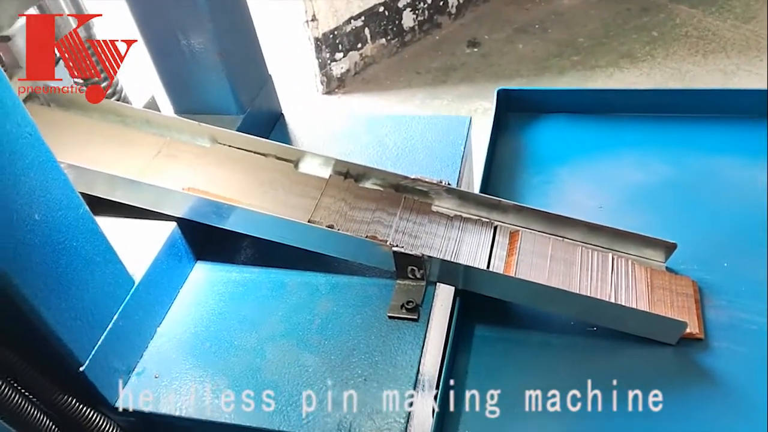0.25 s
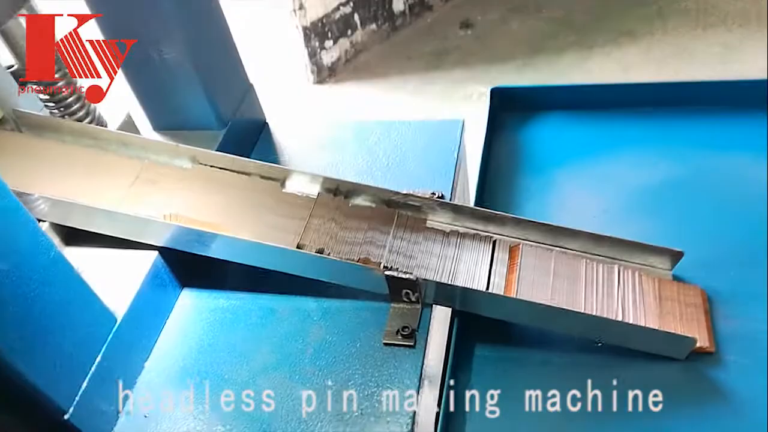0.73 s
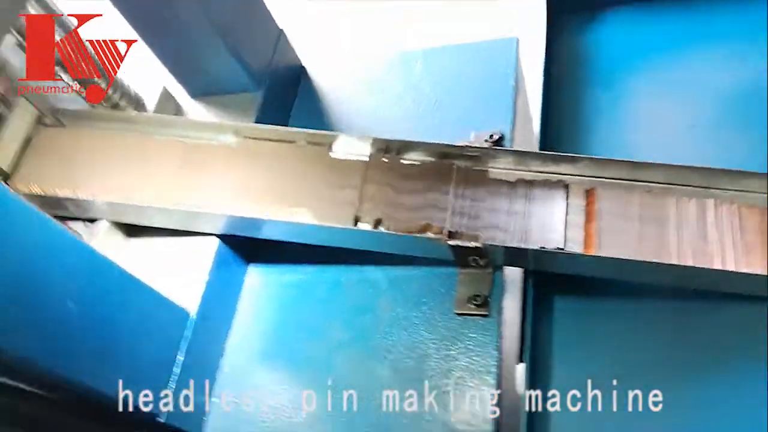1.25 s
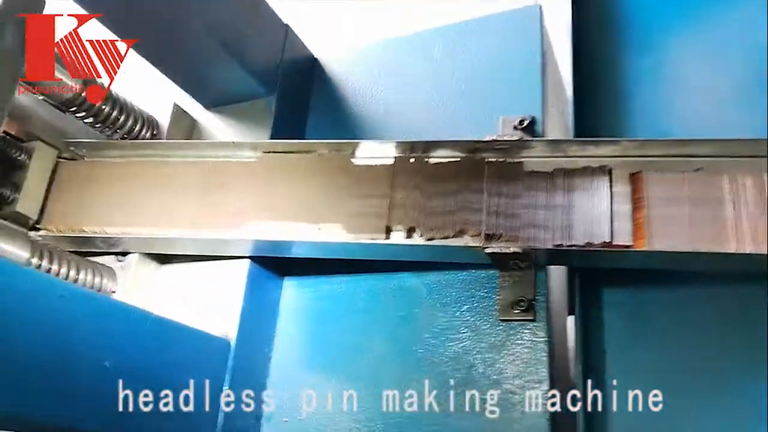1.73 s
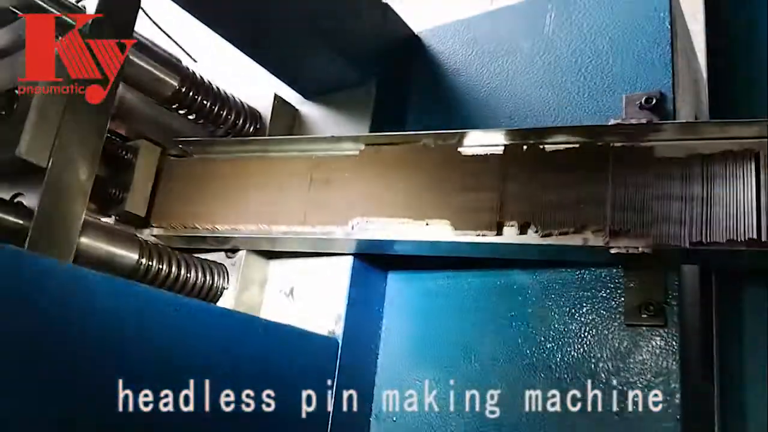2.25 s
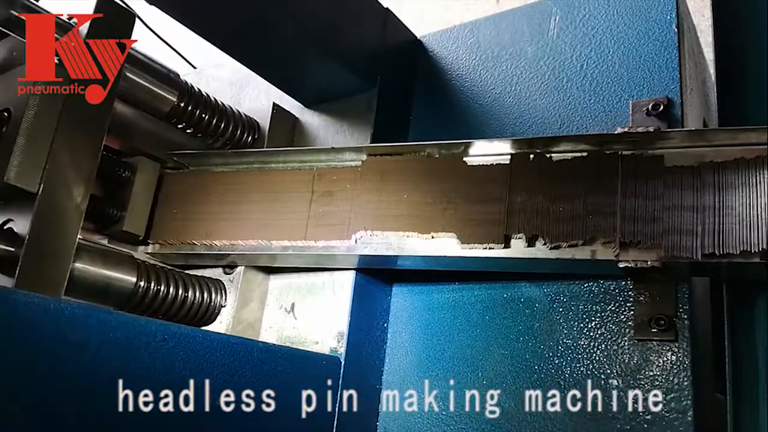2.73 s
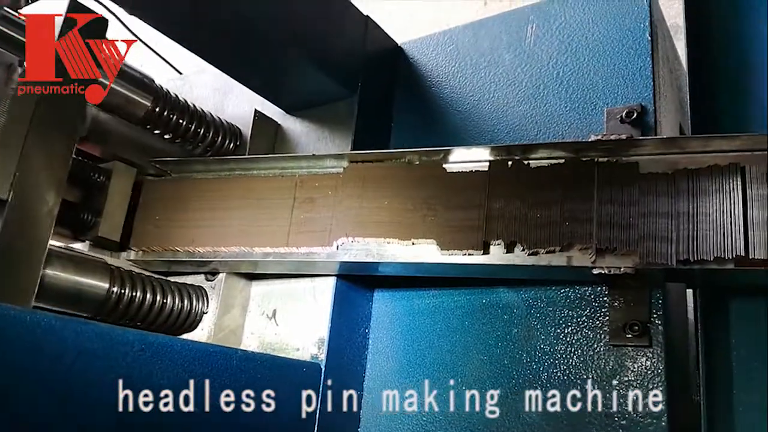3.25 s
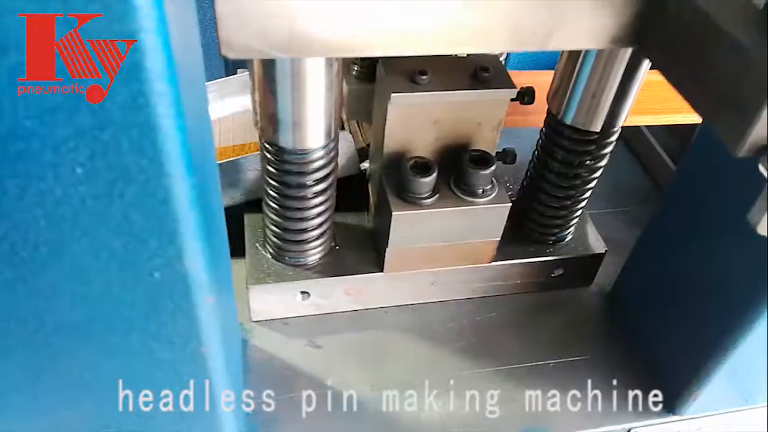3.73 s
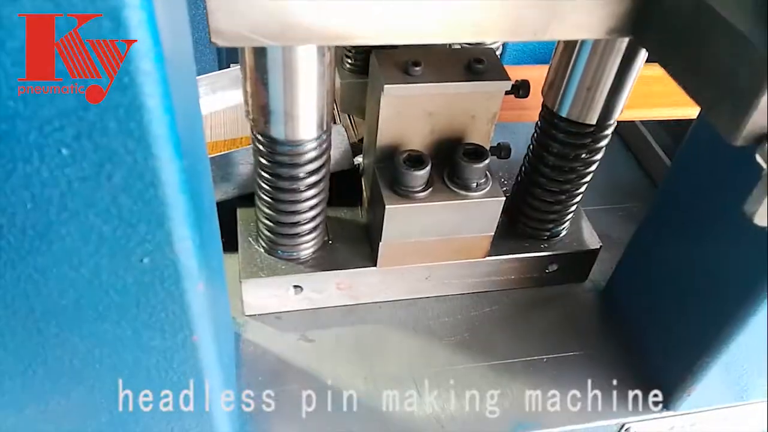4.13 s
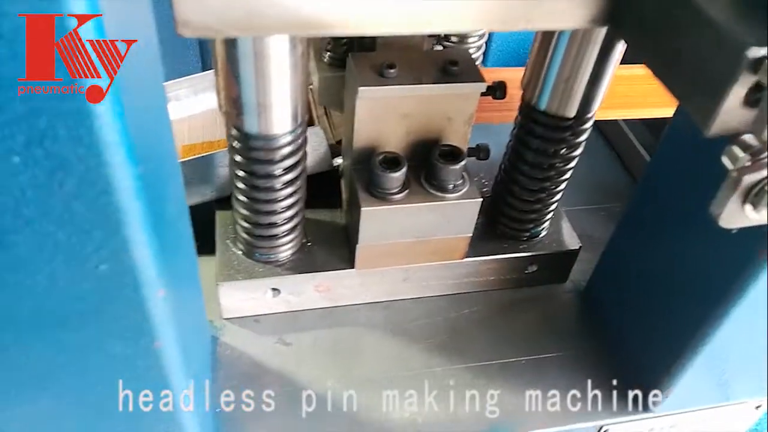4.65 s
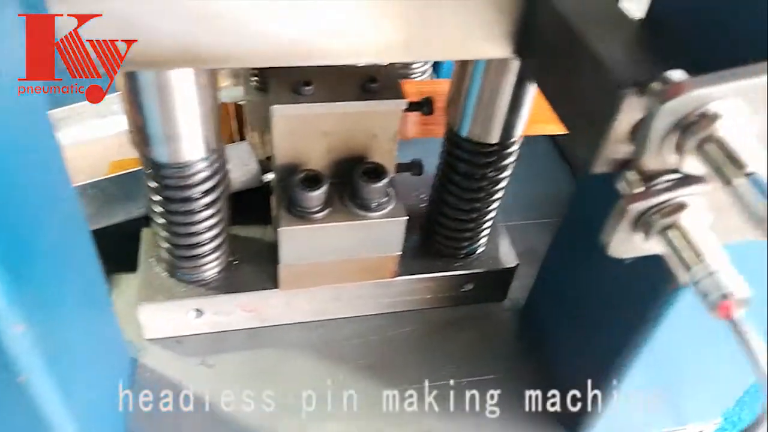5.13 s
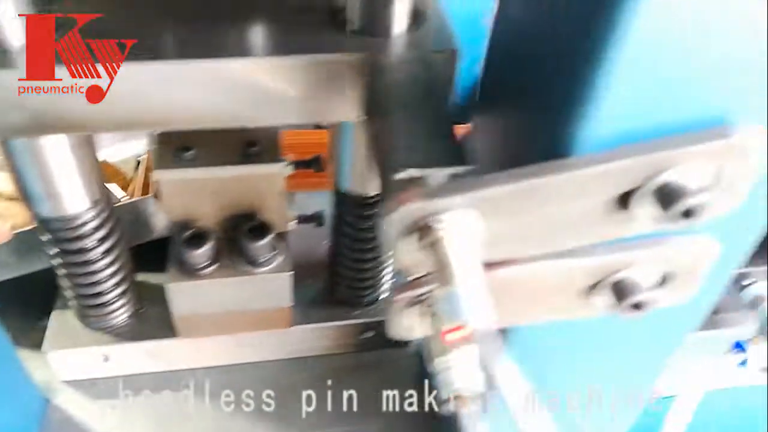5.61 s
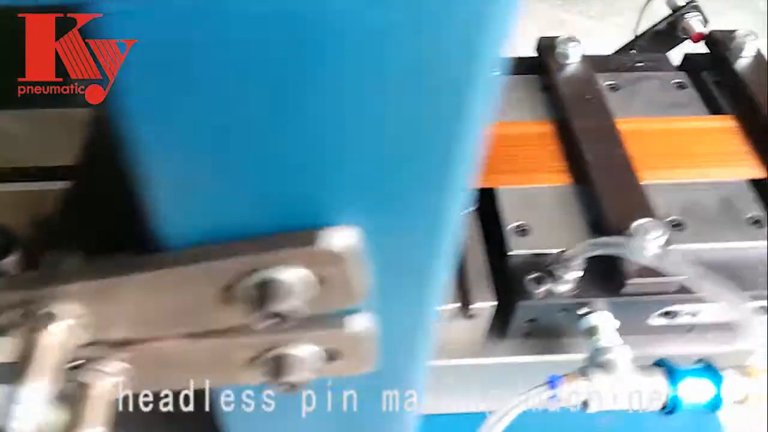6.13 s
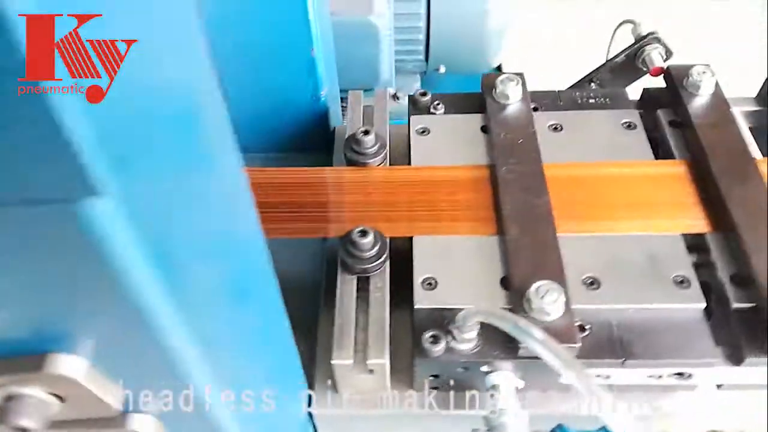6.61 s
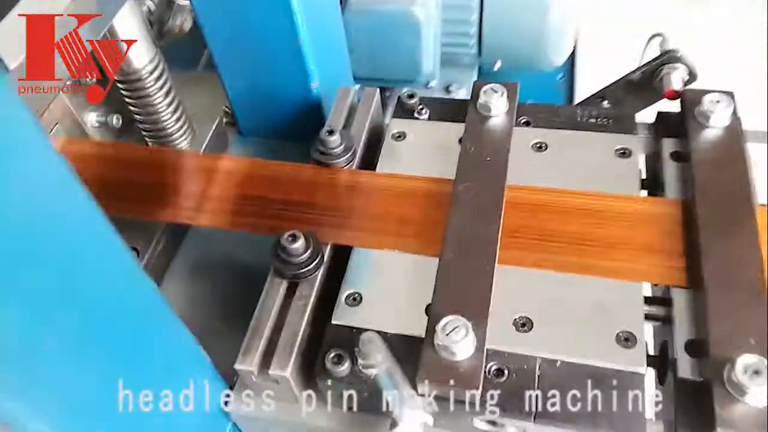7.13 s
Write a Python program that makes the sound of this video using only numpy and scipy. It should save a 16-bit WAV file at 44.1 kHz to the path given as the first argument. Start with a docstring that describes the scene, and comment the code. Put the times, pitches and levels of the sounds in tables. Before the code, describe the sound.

In a reverberant workshop, a pneumatic press cuts wire at roughly three strokes a second. Each crack leaves a short metallic ring; half a beat later a clamp clacks, air jets out, and a feed slide knocks its stop with a thump. Exhaust hiss sinks between strokes over a soft motor drone. Midway the close microphone jumps nearer, making the feeder's clacks and air much sharper.

```python
"""A pneumatic press chops a band of glued wire into pins, about three strokes a second, in a workshop.
Cuts are noise cracks over ringing modes; a clamp clacks and the feed slide hits its stop likewise.
The valve's jet and the cylinder's exhaust are coloured noise bursts; a motor hums underneath.
Heard first from the outlet chute, then, switching abruptly at 3.6 s, from the die towards the feeder."""
import sys
import numpy as np
from scipy import signal
from scipy.fft import rfft, irfft
from scipy.io import wavfile

SR = 44100
rng = np.random.default_rng(int(sys.argv[2]) if len(sys.argv) > 2 else 0)


def to_wav(s):
    """Save 16-bit WAV."""
    ch = np.atleast_2d(s).T  # columns
    pcm = np.round(np.clip(ch, -1, 1) * 32767)  # PCM
    wavfile.write(sys.argv[1], SR, pcm.astype(np.int16))


N = 325017

# Nearness to the press. Each row: time in seconds, level in dB.
PRESS_NEARNESS = [(0.2, -4), (2.6, -1.6), (4.2, -1), (5.2, 0), (6.9, -1.5)]
# Die knock, strongest up the chute. Each row: time in seconds, relative level in dB.
DIE_KNOCK_LEVEL = [(0.2, -24.5), (2.4, -19), (3.6, -22), (6.1, -23), (7.1, -25)]
# Blade ring, strongest beside the die. Each row: time in seconds, relative level in dB.
BLADE_RING_LEVEL = [(0.4, -20.3), (2.4, -24), (3.3, -22), (3.6, -19), (5.1, -18), (7, -20.3)]
# Press modes. Each row: frequency in Hz, relative energy in dB, t60 in seconds.
PRESS_MODES = [(257, -17.5, 0.11), (376, -13, 0.047), (611, -12, 0.042), (667, 0, 0.026), (914, -10, 0.039),
               (1053, -0.5, 0.014), (1161, -5, 0.019), (1557, -13, 0.016), (1800, -11.5, 0.024),
               (2073.7, -3, 0.05), (2256, -12.5, 0.019), (2505, -18, 0.014), (893, -14.5, 0.65),
               (970.6, -18.5, 0.59), (1060, -32, 0.43), (1914, -16, 0.42), (2040, -19, 0.44),
               (3097, -29.5, 0.36), (3750, -24, 0.18)]
# Feeder modes. Each row: frequency in Hz, relative energy in dB, t60 in seconds.
FEEDER_MODES = [(329, -14, 0.015), (634, -14.5, 0.038), (1005, -11, 0.014), (1295, -9, 0.018),
                (1460, -6, 0.048), (1832, -6.5, 0.026), (2134, -11.5, 0.063)]
# Nearness to the feeder, scaled per sound. Each row: time in seconds, level in dB.
FEEDER_NEARNESS = [(0, -18), (3.5, -18.5), (3.8, -11.5), (5.8, -9), (6.2, -5), (6.55, -4), (6.9, -2),
                   (7.3, -1)]

# Noise spectra, in order: cut crack, clamp and slide clack, slide thump, valve jet heard from the chute
# and from the die, low puff of the valve, cylinder exhaust, workshop drone.
# Each row: frequency in Hz, relative density in dB per Hz.
CRACK_SPECTRUM = [(1200, -8.5), (2400, -2), (4000, -2), (6000, -0.5), (8300, 2), (10500, -7.5),
                  (16000, -12)]
CLACK_SPECTRUM = [(1000, -5), (2700, -16), (4300, 3), (5800, -2.5), (7800, 6.5), (10500, -7), (16000, -12)]
THUMP_SPECTRUM = [(20, 1), (45, 16.5), (100, 4), (300, -1), (600, -25.5), (2000, 2)]
CHUTE_JET_SPECTRUM = [(1530, -51), (2600, -11.5), (3050, -28), (4100, -10.5), (6780, -8.5), (8130, 2),
                      (9050, -1.5), (11300, -9.5), (12400, -6), (14900, -6.5), (16000, -27)]
DIE_JET_SPECTRUM = [(1410, -45), (2400, -18.5), (2600, -24), (2750, -18), (3430, -4), (3740, -2.5),
                    (5930, -4.5), (7960, 4.5), (11600, -8.5), (14500, -7), (16000, -19)]
PUFF_SPECTRUM = [(20, -3), (60, 0.5), (130, -0.5), (210, 2), (300, -2), (470, -6.5), (1500, -2.5),
                 (3000, -7.5), (8000, -14.5)]
EXHAUST_SPECTRUM = [(1200, -32), (2000, -5.5), (2800, -9.5), (3600, -4), (4400, -3.5), (5600, -4),
                    (7600, 0), (9100, -1.5), (11500, -8), (16000, -8)]
DRONE_SPECTRUM = [(20, -17), (60, -14), (100, -6), (160, 1), (260, 0.5), (480, -3), (700, 0), (1000, 2.5),
                  (1400, 0.5), (2000, 6.5), (2800, -23), (6000, -99), (16000, -42)]

# Motor lines. Each row: frequency in Hz, rms level in dB before flutter.
MOTOR_LINES = [(107, -54.5), (890, -59.5)]
# Workshop level. Each row: time in seconds, drone level in dB, low rumble level in dB.
WORKSHOP_LEVEL = [(0, -36.5, -48.5), (3.5, -36.5, -52.5), (3.7, -37, -57), (7.37, -41, -75)]
# Workshop decay. Each row: frequency in Hz, t60 in seconds.
WORKSHOP_T60 = [(100, 0.26), (1000, 0.36), (2200, 0.43), (4000, 0.27), (8000, 0.22), (16000, 0.28)]
# Likeness of the two microphone ports. Each row: frequency in Hz, correlation (clipped to -1..1).
PORT_LIKENESS = [(60, 0.8), (150, 2), (300, 1.77), (600, -0.2), (1100, 1.3), (2000, 0.26), (4000, -0.16),
                 (16000, 0.15)]
# Colour of the ports. Each row: frequency in Hz, left minus right in dB.
PORT_TILT = [(100, 0), (350, 0), (650, -4.5), (1100, -1.5), (2000, 3.5), (3000, -2), (4500, -3.5),
             (7500, -11.5), (9500, -11.5), (11500, 0.5), (16000, 2.5)]
# Phase of the ports. Each row: frequency in Hz, left lead in radians.
PORT_LEAD = [(60, -.2), (140, -0.13), (280, -0.69), (500, -0.82), (950, -0.29)]

# From the chute the beat gathers a little speed; from the die it is even.
CHUTE_FIRST_CUT_S, CHUTE_PERIOD_S, QUICKEN_S, CHUTE_STROKES = .229, .3449, .00028, 10
DIE_FIRST_CUT_S, DIE_PERIOD_S, DIE_STROKES = 3.6165, .3421, 11
AT_DIE_S = 3.6   # the press is heard from the die from here on
# The valve vents half a cycle after each cut; the clamp closes before it, the slide arrives after it.
CHUTE_VENT_LAG_S, DIE_VENT_LAG_S, CLAMP_LEAD_S, TRAVEL_S = .1735, .172, .021, .048

# Relative levels; each is trimmed again in its source's mix.
THUD_DB, CRACK_DB, STROKE_SCATTER_DB = -26.5, -18, .5
JET_CHUTE_DB, JET_FEEDER_DB, JET_NEARNESS_SHARE = -22, -16, .63
EXHAUST_CHUTE_DB, EXHAUST_DIE_DB, EXHAUST_FADE_DB_PER_S = -21.5, -18, .5
CUTOFF_HZ, PEAK_LIMIT = 15900, .92

TIME_S = np.arange(N) / SR
FREQ_HZ = np.maximum(np.fft.rfftfreq(N, 1 / SR), 1)
CHUTE_STROKE = np.arange(CHUTE_STROKES)
CHUTE_CUTS_S = CHUTE_FIRST_CUT_S + CHUTE_PERIOD_S * CHUTE_STROKE - QUICKEN_S * CHUTE_STROKE ** 2
DIE_CUTS_S = DIE_FIRST_CUT_S + DIE_PERIOD_S * np.arange(DIE_STROKES)
CUT_TIMES_S = np.r_[CHUTE_CUTS_S, DIE_CUTS_S]
# One vent precedes the first cut.
CHUTE_VENTS_S = np.r_[CHUTE_FIRST_CUT_S - CHUTE_PERIOD_S, CHUTE_CUTS_S] + CHUTE_VENT_LAG_S
VENT_TIMES_S = np.r_[CHUTE_VENTS_S, DIE_CUTS_S + DIE_VENT_LAG_S]


def from_db(db):
    """Decibels to gain."""
    return 10 ** (np.asarray(db) / 20)


def rms_one(x):
    """Scale to an rms of 1."""
    return x / np.sqrt(np.mean(x ** 2) + 1e-20)


def unit_energy(x):
    """Scale to a mean energy of 1 per channel."""
    return rms_one(x) / np.sqrt(x.shape[-1])


def at_hz(points, hz):
    """Read a table on a log-frequency axis."""
    point_hz, value = np.transpose(points)
    return np.interp(np.log(hz), np.log(point_hz), value)


def at_time(rows, time_s, column=1):
    """Read one column of a time curve."""
    rows = np.array(rows)
    return np.interp(time_s, rows[:, 0], rows[:, column])


def stereo(mid, side, hz):
    """Left and right from two unrelated signals, as alike as the ports hear that pitch."""
    alike = np.clip(at_hz(PORT_LIKENESS, hz), -1, 1)
    return np.sqrt(1 + alike) * mid + np.sqrt(1 - alike) * side * np.array([[1], [-1]])


def noise(spectrum):
    """Steady stereo noise of a given colour, rms 1."""
    mid, side = rfft(rng.standard_normal((2, N)))
    coloured = stereo(mid, side, FREQ_HZ) * from_db(at_hz(spectrum, FREQ_HZ))
    return rms_one(irfft(coloured, N))


def flutter(depth_db, rate_hz):
    """Gain that wanders at random between knots spaced at rate_hz."""
    knots = rng.standard_normal(int(N / SR * rate_hz) + 2)
    return from_db(depth_db * np.interp(TIME_S * rate_hz, np.arange(len(knots)), knots))


def bursts(times_s, levels_db, rise_s, hold_s, t60_s):
    """Envelope of bursts that open, hold and die away; overlaps add in power."""
    power = np.zeros(N)
    for start_s, level_db in zip(times_s, levels_db):
        start = int(start_s * SR)
        span = slice(max(start, 0), max(start + SR // 2, 0))
        age_s = np.maximum(TIME_S[span] - start_s, 0)
        opening = np.minimum(age_s / rise_s, 1)
        decay_db = 60 * np.maximum(age_s - hold_s, 0) / t60_s
        power[span] += (opening * from_db(level_db - decay_db)) ** 2
    return np.sqrt(power)


def add(out, start_s, sound):
    """Mix a short sound in at a time."""
    start = int(np.clip(start_s * SR, 0, N))
    out[:, start:start + sound.shape[1]] += sound[:, :N - start]


def strike(modes, contact_s, scatter_db, grit):
    """A gritty contact swells and fades within milliseconds and sets each mode ringing."""
    age_s, out = TIME_S[:SR // 2], np.zeros((2, SR // 2))
    force = np.sin(np.pi * np.minimum(age_s / contact_s, 1)) ** 2
    for k, (hz, level_db, t60_s) in enumerate(modes):
        phase = 2 * np.pi * hz * (age_s - contact_s / 2) + k * np.pi / 2
        rough = np.resize(rng.standard_normal((SR // 50, 2)), (len(age_s), 2)).T
        push = force * (np.cos(phase + .5 * rng.normal()) + grit * stereo(*rough, hz))
        # two-pole resonator
        radius, angle = from_db(-60 / (t60_s * SR)), 2 * np.pi * hz / SR
        ring = signal.lfilter([1, 0, -1], [1, -2 * radius * np.cos(angle), radius ** 2], push)
        out += from_db(level_db + scatter_db * rng.normal()) * unit_energy(ring)
    return out * np.sqrt(SR / 100)   # energy 1 becomes rms 1 over 10 ms


def blade():
    """The blade cracks through the row of wires; frame, die and blade ring, each with its own strength."""
    out, modes = np.zeros((2, N)), np.array(PRESS_MODES)
    mode_hz = modes[:, 0]
    low = mode_hz < 1700
    force_db = STROKE_SCATTER_DB * rng.standard_normal(len(CUT_TIMES_S))
    near_db = at_time(PRESS_NEARNESS, CUT_TIMES_S)
    for cut_s, force, near in zip(CUT_TIMES_S, force_db, near_db):
        knock_db, ring_db = at_time(DIE_KNOCK_LEVEL, cut_s), at_time(BLADE_RING_LEVEL, cut_s)
        part_db = [(700, THUD_DB + near), (880, knock_db), (1300, knock_db), (1750, ring_db)]
        blow = modes.copy()
        blow[:, 1] += force + at_hz(part_db, mode_hz)
        # down the chute the knock arrives as one compact bump; at the die it is drawn out
        delay_s, contact_s = (.0008, .004) if cut_s < AT_DIE_S else (-.0008, .0068)
        add(out, cut_s + delay_s, strike(blow[low], contact_s, scatter_db=.5, grit=1.16))
        # the blade rings up as it breaks through
        add(out, cut_s, strike(blow[~low], contact_s=.0095, scatter_db=1.34, grit=2.35))
    crack_db = CRACK_DB + near_db + force_db
    crack_level = bursts(CUT_TIMES_S - .0005, crack_db, rise_s=.0015, hold_s=.0061, t60_s=.054)
    crack = noise(CRACK_SPECTRUM) * crack_level * flutter(depth_db=2, rate_hz=910)
    return from_db(4.5) * out + from_db(1.0) * crack


def clamp():
    """The valve spool ticks, then the clamp snaps shut on the band; the housing shields its treble from afar."""
    times_s = VENT_TIMES_S - CLAMP_LEAD_S
    near_db = at_time(FEEDER_NEARNESS, times_s)
    snap = bursts(times_s, 1.42 * near_db, rise_s=.00076, hold_s=.0027, t60_s=.037)
    tick = bursts(times_s - .0155, .61 * near_db, rise_s=.0022, hold_s=.0025, t60_s=.11)
    out = noise(CLACK_SPECTRUM) * (from_db(-13.5) * snap + from_db(-37.5) * tick)
    for snap_s, near in zip(times_s, near_db):
        ring = strike(FEEDER_MODES, contact_s=.00358, scatter_db=5.0, grit=3.5)
        add(out, snap_s, from_db(-24 + .45 * near) * ring)
    return out


def slide():
    """The feed slide cracks onto its stop with a dull thump, blurred from afar; a light tap follows."""
    times_s = VENT_TIMES_S + TRAVEL_S
    near_db = at_time(FEEDER_NEARNESS, times_s)
    thump_level = bursts(times_s, .85 * near_db, rise_s=.00082, hold_s=.0062, t60_s=.057)
    crack_level = bursts(times_s, .8 * near_db, rise_s=.00067, hold_s=.0019, t60_s=.024)
    thump = noise(THUMP_SPECTRUM) * thump_level
    crack = noise(CLACK_SPECTRUM) * crack_level
    out = from_db(-19.0) * thump + from_db(-13) * crack
    for stop_s, near in zip(times_s, near_db):
        contact_s = .016 if stop_s < AT_DIE_S else .005
        hit = strike(FEEDER_MODES, contact_s, scatter_db=3.0, grit=4.8)
        tap = strike(FEEDER_MODES, contact_s=.00413, scatter_db=3.0, grit=2.3)
        add(out, stop_s - .001, from_db(-22.5 + .36 * near) * hit)
        add(out, stop_s + .07, from_db(-31.5 + .48 * near) * tap)
    return out


def valve():
    """A short sharp jet of air; close to the feeder its blast is also felt as a low puff."""
    times_s, near_db = VENT_TIMES_S, at_time(FEEDER_NEARNESS, VENT_TIMES_S)
    hiss_db = np.where(times_s < AT_DIE_S, JET_CHUTE_DB, JET_FEEDER_DB + JET_NEARNESS_SHARE * near_db)
    jet = from_db(2.0) * np.where(TIME_S < AT_DIE_S, noise(CHUTE_JET_SPECTRUM), noise(DIE_JET_SPECTRUM))
    hiss_level = bursts(times_s - .0015, hiss_db, rise_s=.0073, hold_s=.034, t60_s=.36)
    hiss = jet * hiss_level * flutter(depth_db=2.0, rate_hz=250)
    puff_level = bursts(times_s, 1.48 * near_db, rise_s=.0011, hold_s=.022, t60_s=.056)
    puff = noise(PUFF_SPECTRUM) * puff_level * flutter(depth_db=2.5, rate_hz=280)
    return hiss + from_db(-18) * puff


def cylinder():
    """The cylinder empties: the hiss sinks and grows duller as its pressure falls."""
    # one exhaust is already running at the start
    times_s = np.r_[VENT_TIMES_S[0] - CHUTE_PERIOD_S, VENT_TIMES_S] + TRAVEL_S - .004
    # from the die on, each exhaust is a little weaker than the last
    die_db = EXHAUST_DIE_DB - EXHAUST_FADE_DB_PER_S * (times_s - AT_DIE_S)
    hiss_db = np.where(times_s < AT_DIE_S, EXHAUST_CHUTE_DB, die_db)
    air = noise(EXHAUST_SPECTRUM) * flutter(depth_db=.3, rate_hz=200)
    dull = signal.sosfilt(signal.butter(1, 6000, fs=SR, output="sos"), air)
    bright = air - dull
    dull_level = bursts(times_s, hiss_db, rise_s=.0027, hold_s=.01, t60_s=.53)
    # a soft extra wash of hiss just after 3.6 s
    dull_level += bursts([3.65], [-38], rise_s=.021, hold_s=.16, t60_s=.12)
    bright_level = bursts(times_s, hiss_db, rise_s=.0018, hold_s=.0052, t60_s=.28)
    return from_db(1.5) * dull * dull_level + from_db(-.5) * bright * bright_level


def motor():
    """Drone of the drive and the workshop, with more rumble by the chute; hum lines waver in level."""
    drone_gain = from_db(at_time(WORKSHOP_LEVEL, TIME_S))
    drone = drone_gain * noise(DRONE_SPECTRUM) * flutter(depth_db=1.5, rate_hz=42)
    rumble_gain = from_db(at_time(WORKSHOP_LEVEL, TIME_S, column=2))
    rumble = rumble_gain * noise([(70, -35), (150, 11.5), (240, 2.5), (500, -39)])
    hum = np.zeros(N)
    for hz, level_db in MOTOR_LINES:
        line = np.sqrt(2) * np.sin(2 * np.pi * hz * TIME_S)
        hum = hum + from_db(level_db) * line * flutter(depth_db=4.5, rate_hz=8)
    return drone + rumble + hum


def workshop(x):
    """Dense reflections from the housing and walls: octave bands of noise, each with its own decay."""
    age_s, response = TIME_S[:SR * 2 // 3], 0
    edges_hz = 60 * 2 ** np.arange(9)
    for low_hz, high_hz in zip(edges_hz, edges_hz[1:]):
        octave = signal.butter(2, [low_hz, high_hz], "band", fs=SR, output="sos")
        band = signal.sosfilt(octave, rng.standard_normal((2, len(age_s))))
        centre_hz = np.sqrt(low_hz * high_hz)
        decay = from_db(-60 * age_s / at_hz(WORKSHOP_T60, centre_hz))
        response = response + stereo(*band, centre_hz) * decay
    response = unit_energy(response * np.minimum(age_s / .011, 1))
    return signal.fftconvolve(x, response, axes=1)[:, :N]


def scene():
    """Metal and air, direct and reflected by the workshop, over the motor."""
    cut, feed, air = blade(), clamp() + slide(), valve() + cylinder()
    reflected = workshop(from_db(-6.5) * cut + from_db(-8.0) * feed + from_db(-11) * air)
    return cut + feed + air + reflected + motor()


def record(dry):
    """The two ports differ in colour and phase; the loudest peaks are rounded and the top is cut."""
    half = np.array([[.5], [-.5]])
    tilt = from_db(at_hz(PORT_TILT, FREQ_HZ) * half)
    tilt = tilt / np.sqrt(np.mean(tilt ** 2, axis=0))   # keep the summed power of the two ports
    phase = np.exp(1j * at_hz(PORT_LEAD, FREQ_HZ) * half)
    heard = irfft(rfft(dry) * phase * tilt, N)
    heard = heard / (1 + (heard / PEAK_LIMIT) ** 6) ** (1 / 6)
    return signal.sosfilt(signal.ellip(10, .1, 90, CUTOFF_HZ, fs=SR, output="sos"), heard)


dry = scene()
out = record(dry)
to_wav(out)
```